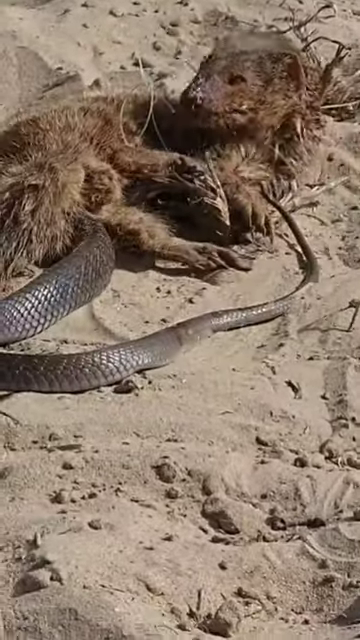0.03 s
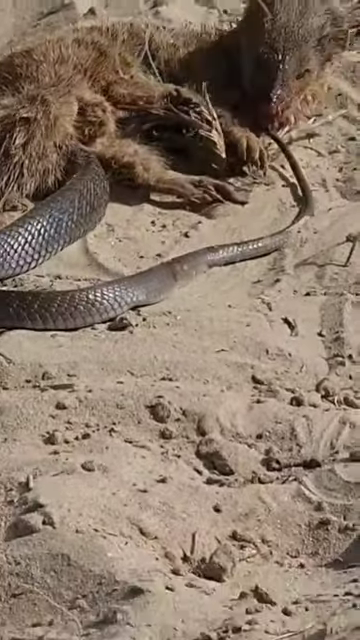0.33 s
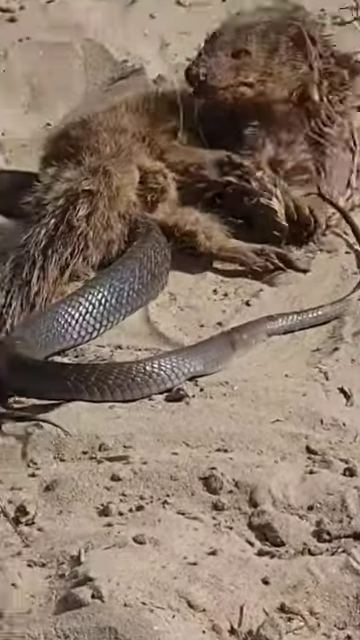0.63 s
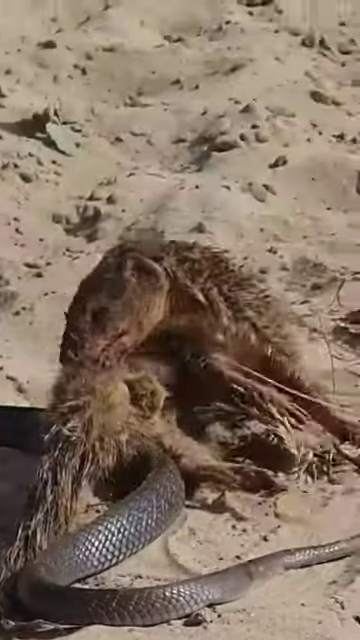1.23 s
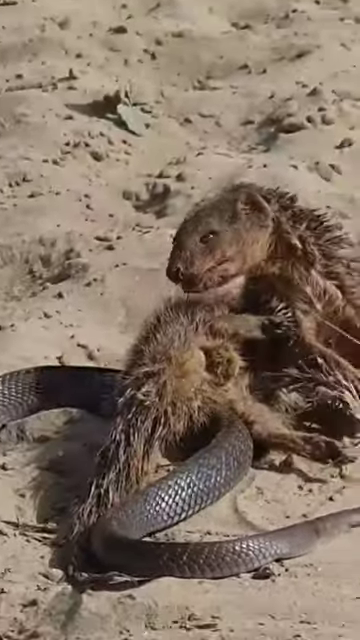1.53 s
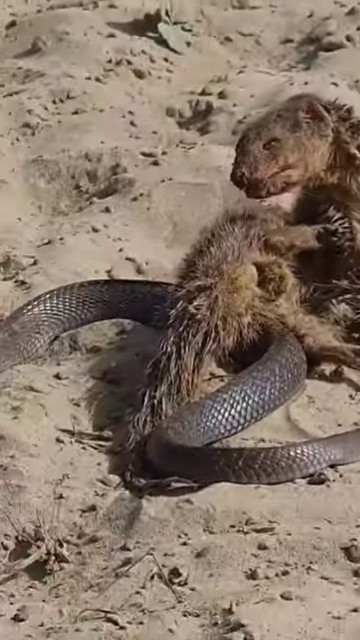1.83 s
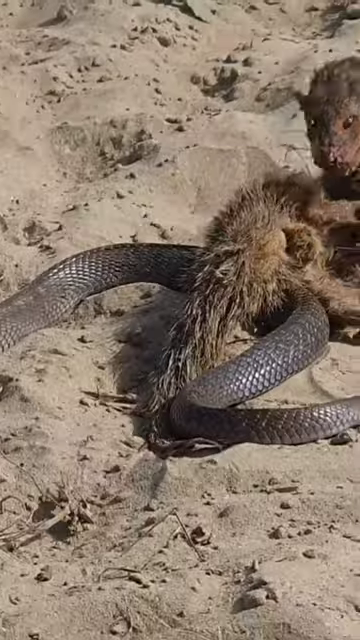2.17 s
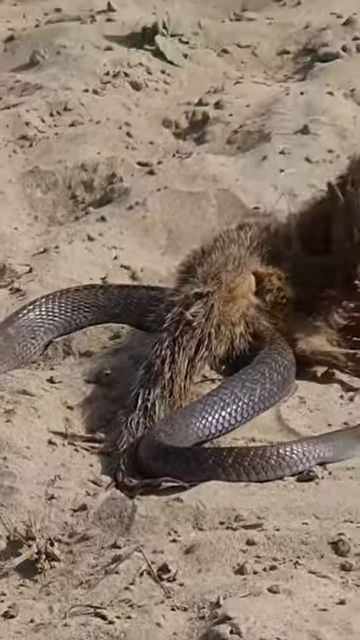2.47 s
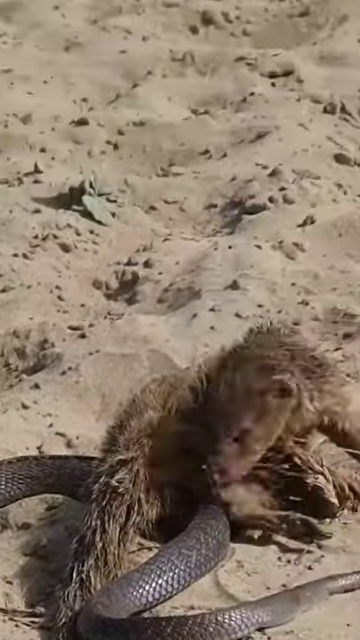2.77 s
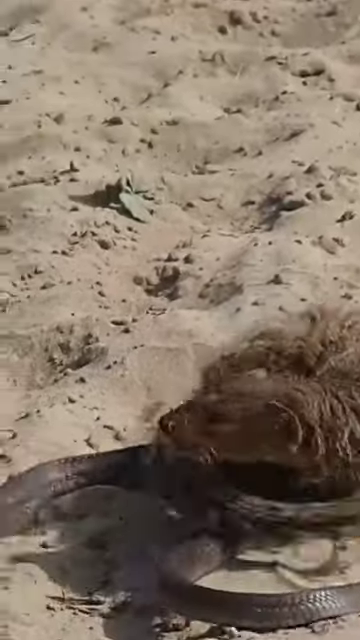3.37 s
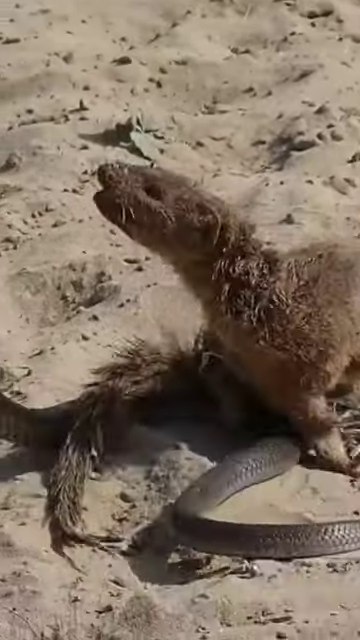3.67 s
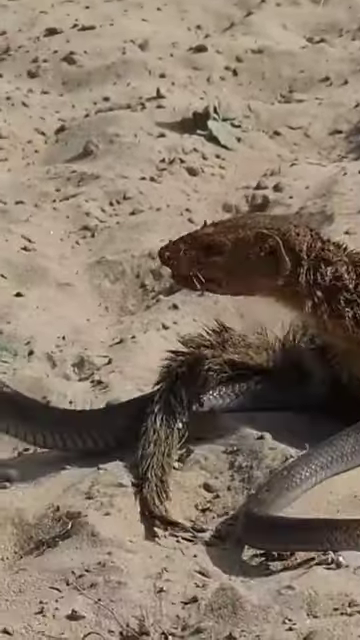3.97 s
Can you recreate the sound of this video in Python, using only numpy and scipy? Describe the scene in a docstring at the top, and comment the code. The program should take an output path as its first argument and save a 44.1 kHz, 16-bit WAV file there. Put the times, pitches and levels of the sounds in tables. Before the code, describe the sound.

Animals scuffling on dry sand, ending in a short raspy hiss, amid wind and bird whistles.

```python
"""Scales slide, paws scrape and grit ticks on dry sand, close to a handheld microphone in light wind:
a mongoose and a snake are scuffling. Late on, a lunge brings one short, spitting hiss of air forced
through the mouth, with a rasp from the throat and a soft thump on landing. Off to the right a bird
repeats a whistle that ends in a falling slur; fainter birds call far across the field.
Once, the sound cuts out for an instant with a dry crackle."""
import sys
import numpy as np
from scipy import signal
from scipy.fft import rfft, irfft
from scipy.io import wavfile
from scipy.ndimage import uniform_filter1d

SR = 44100
rng = np.random.default_rng(int(sys.argv[2]) if len(sys.argv) > 2 else 0)


def unload_wav(signal):
    """Save mono or channel-first audio to the path in sys.argv[1] as 16-bit WAV at rate SR, clipped to [-1, 1]."""
    wavfile.write(
        sys.argv[1],
        SR,
        np.round(np.clip(np.atleast_2d(signal).T, -1, 1) * 32767).astype(np.int16),
    )


N = 176400
T = np.arange(N) / SR
LUNGE_S = 3.364

# stereo width and left-right balance of ground and air (frequency [Hz], likeness [-1..1], L-R [dB])
GROUND_STEREO = [(37.8, 0.44, 0), (138, 0.88, -.5), (302, 0.85, -.5), (680, 0.33, 0.5), (1380, 0.23, 3),
                 (1900, 0.27, 6.5), (3200, -0.027, 6), (4750, 0.046, 0), (7000, 0.21, 6), (10600, 0.94, 2),
                 (15000, 0.96, 0.5)]


def amp(db):
    """Decibels to gain."""
    return 10 ** (np.asarray(db) / 20)


def unit(x):
    """Scales to rms 1."""
    return x / np.sqrt(np.mean(x ** 2) + 1e-20)


def curve(table):
    """Every column of a time table, joined by straight lines."""
    times, *columns = np.transpose(table)
    return [np.interp(T, times, c) for c in columns]


def by_hz(table, hz):
    """Every column of a frequency table, read at hz on a log axis."""
    freqs, *columns = np.transpose(table)
    return [np.interp(np.log(hz + 1), np.log(freqs), c) for c in columns]


def placed(x, pan_db):
    """Places a sound in the stereo field; positive pan_db is to the left."""
    gains = amp([[pan_db / 2], [-pan_db / 2]])
    return x * gains / gains.mean()


def add(mix, s, sound):
    """Mixes a stereo sound in at s seconds."""
    part = mix[:, round(s * SR):][:, :sound.shape[1]]
    part += sound[:, :part.shape[1]]


def drift(rate_hz):
    """Smooth random movement of rms 1."""
    hz = np.fft.rfftfreq(N, 1 / SR)
    return unit(irfft(rfft(rng.standard_normal(N)) * np.exp(-(hz / rate_hz) ** 2), N))


def texture(colour, stereo, patchy_db, grain_db=0, grains_per_s=3000):
    """Stereo noise of rms 1, made of tiny uneven grains, coloured, with drifting patches."""
    grain_index = np.cumsum(rng.random(N) < grains_per_s / SR)
    grain_gain = amp(grain_db * np.minimum(rng.exponential(1, N), 2 * np.pi))[grain_index]
    frames = dict(nperseg=2048, noverlap=1536)
    hz, _, (left, apart) = signal.stft(grain_gain * rng.standard_normal((2, N)), SR, **frames)
    likeness, pan_db = (c[:, None] for c in by_hz(stereo, hz))
    likeness = np.clip(likeness, -1, 1)
    right = likeness * left + np.sqrt(1 - likeness ** 2) * apart
    spectra = np.array([left * amp(pan_db / 2), right * amp(-pan_db / 2)])
    spectra /= np.sqrt(amp(pan_db) + amp(-pan_db))
    patches = uniform_filter1d(rng.standard_normal(left.shape), size=14, axis=0)
    patches = unit(uniform_filter1d(patches, size=6, axis=1))
    patch_db = patchy_db * patches / np.hypot(1, hz / 4000)[:, None]  # shallower above 4 kHz
    spectra *= amp(by_hz(colour, hz)[0][:, None] + patch_db)
    return unit(signal.istft(spectra, **frames)[1][:, :N])


def stroke(s, rise_s, fall_s, db):
    """A swell and fade that peaks at s seconds."""
    return amp(db) * np.exp(-.5 * ((T - s) / np.where(T < s, rise_s, fall_s)) ** 2)


def resonate(x, hz, width_hz):
    """A steep resonance at a steady or moving pitch, scaled to rms 1."""
    carrier = np.exp(2j * np.pi * np.cumsum(np.broadcast_to(hz, N)) / SR)
    lowpass = signal.butter(N=4, Wn=width_hz / 2, fs=SR, output="sos")
    return unit((carrier * signal.sosfilt(lowpass, x / carrier)).real)


def scuffle():
    """Close by, fine sand fizzes under sliding bodies; scrapes are coarser, and a heavy coil drags low."""
    # bodies sliding over sand (time [s], level [dB])
    slide_levels = [(0, -78), (.25, -68), (.3, -56), (.4, -55), (.5, -54.5), (.6, -52), (.69, -55.5),
                    (.81, -52.5), (.85, -58), (1.05, -65), (1.25, -58.5), (1.36, -69.5), (1.5, -60.5),
                    (1.75, -52), (1.85, -56.5), (1.89, -70.5), (2.7, -81), (2.85, -63.5), (3.2, -69.5),
                    (4, -78)]
    # scrapes of paws and bodies (peak time [s], rise [s], fall [s], level [dB])
    scrape_strokes = [(.44, 0.088, 0.089, -51), (.572, 0.029, 0.056, -49), (.73, 0.021, 0.042, -54.5),
                      (0.805, 0.022, 0.027, -46.5), (.952, 0.032, 0.017, -48), (1.2, 0.17, 0.03, -58),
                      (2.46, 0.039, 0.068, -56), (2.74, 0.034, 0.041, -59.5), (2.86, 0.044, 0.065, -58.5),
                      (3.295, 0.012, 0.0066, -49), (3.37, 0.03, 0.067, -52)]
    # the coil dragging over the ground (peak time [s], rise [s], fall [s], level [dB])
    drag_strokes = [(1.3, 0.33, 0.27, -56)]
    # spectra of sliding, scraping and dragging (frequency [Hz], relative level [dB])
    sand_colour = [(100, -8), (280, 9.5), (450, 5.5), (850, -6), (1400, -3), (2100, 2.5), (2900, -2.5),
                   (3600, 4), (4500, -6), (5700, 1), (7000, -1), (9000, -3.5), (11500, 4), (13500, 1.5),
                   (16000, -6.5)]
    scrape_colour = [(100, 5.5), (300, -3.5), (800, -12), (1200, -3.5), (1550, -6), (1900, 2.5),
                     (2300, -6.5), (2900, -9), (3600, -13), (4600, -28.5), (7500, -18), (10000, -31),
                     (16000, -18)]
    drag_colour = [(120, -9), (260, 7.5), (420, -6), (800, -33)]
    slide = texture(sand_colour, GROUND_STEREO, patchy_db=6, grain_db=1.34, grains_per_s=4000)
    slide *= amp(curve(slide_levels)[0] + 0.95 * drift(38))
    scrapes = texture(scrape_colour, GROUND_STEREO, patchy_db=2.5, grain_db=2, grains_per_s=1800)
    scrapes *= np.sqrt(sum(stroke(*row) ** 2 for row in scrape_strokes))
    drag = texture(drag_colour, GROUND_STEREO, patchy_db=4) * sum(stroke(*row) for row in drag_strokes)
    return placed(slide, pan_db=-4.5) + scrapes + drag


def hiss():
    """Air forced through a narrow mouth, which rings hollow as it gapes at the lunge."""
    # strength of the hiss (time [s], sharp edge [dB], breathy middle [dB])
    hiss_levels = [(2.4, -100, -100), (2.8, -65, -59.5), (3.0, -63, -64.5), (3.2, -61, -63.5),
                   (3.28, -53.5, -52), (3.344, -44, -48.5), (3.368, -42, -44.5), (3.412, -38, -46.5),
                   (3.455, -42, -48), (3.506, -48, -55.5), (3.545, -46, -53), (3.58, -45, -47),
                   (3.64, -49, -51), (3.71, -49, -52.5), (3.756, -52.5, -58.5), (3.8, -77, -62.5),
                   (3.85, -79, -109)]
    # spectra of the edge and the middle (frequency [Hz], relative level [dB])
    edge_colour = [(3000, -46), (4700, -34), (5700, -16), (6600, -12), (8600, -15.5), (10000, -19.5),
                   (11300, -10), (12100, -5), (12900, -4), (14100, 2), (15000, 0.5), (16000, -15)]
    middle_colour = [(300, -13), (850, -33), (1010, -9), (1220, -16), (1440, -5), (1640, -5.5), (2080, 6.5),
                     (2420, -4.5), (2740, 1), (3050, -20), (3450, -10.5), (4300, -17.5), (9000, -22)]
    # stereo width and left-right balance of the hiss (frequency [Hz], likeness [-1..1], L-R [dB])
    hiss_stereo = [(640, 0.95, 1), (1200, .4, 2.7), (2120, 0.54, 12.7), (2880, .1, 9.3), (4450, -0.29, 1.2),
                   (6300, -0.82, 6.9), (8550, .6, 17), (10700, .95, 1.6), (14000, 0.85, 3.5)]
    # resonances of the wide-open mouth (frequency [Hz], width [Hz], level [dB])
    gape_modes = [(1010, 190, -55), (1440, 180, -55.5), (2754, 280, -51.5), (3230, 560, -57)]
    edge_db, middle_db = curve(hiss_levels)
    edge = texture(edge_colour, hiss_stereo, patchy_db=9.5) * amp(edge_db + 0.87 * drift(80))
    middle = texture(middle_colour, hiss_stereo, patchy_db=1, grain_db=1.5, grains_per_s=370)
    gape = sum(amp(db) * resonate(rng.standard_normal(N), hz, width) for hz, width, db in gape_modes)
    gape *= stroke(LUNGE_S + 0.0077, rise_s=0.029, fall_s=0.065, db=0)
    return edge + middle * amp(middle_db) + placed(gape, pan_db=8)


def spit():
    """Spurts of air through the teeth; their pitch shoots up as the lunge begins."""
    # spurts at the start of the hiss (peak time [s], rise [s], fall [s], level [dB])
    spurts = [(3.365, .005, .014, -46), (3.413, .01, .01, -51.5)]
    top_hz, climb_hz, climb_s = 8760, 2500, 0.001
    hz = top_hz - climb_hz / (1 + np.exp(np.minimum((T - LUNGE_S) / climb_s, 20)))
    air_jet = resonate(rng.standard_normal(N), hz, width_hz=2160)
    return placed(air_jet * sum(stroke(*row) for row in spurts), pan_db=13)


def rasp():
    """Uneven flaps ring one band of the throat; landing presses out a lower grunt."""
    # the throat under the hiss (time [s], level [dB])
    rasp_levels = [(3.3, -90), (3.35, -66), (3.364, -43.5), (3.395, -54), (3.428, -45.5), (3.45, -50),
                   (3.462, -46), (3.48, -47), (3.555, -53), (3.575, -50.5), (3.64, -51.5), (3.75, -52.5),
                   (3.785, -86), (3.82, -89)]
    flaps_per_s, flap_spread_db, throat_hz = 110, 1.5, 639
    cycles = np.cumsum(flaps_per_s * np.exp(.4 * drift(70))) / SR
    pulses = np.diff(np.floor(cycles), prepend=0)
    flaps = unit(pulses * amp(flap_spread_db * rng.standard_normal(N)))
    airflow = flaps + .7 * rng.standard_normal(N)
    throat = resonate(airflow, throat_hz * (1 + 0.05 * drift(30)), width_hz=216)
    throat *= amp(curve(rasp_levels)[0])
    grunt = resonate(airflow, hz=524, width_hz=197) * stroke(3.577, rise_s=.008, fall_s=.032, db=-42.5)
    return placed(throat + grunt, pan_db=3)


def grit():
    """Grit and twigs tick near the microphone, each a fast-dying burst in one band; the broad tick at 3.363 s
    is instead the crackle of the spit as the lunge begins."""
    # ticks (time [s], centre [Hz], width [octaves], decay [ms], starting level [dB], L-R [dB])
    ticks = [(.2958, 13000, .45, 1.2, -40, -7), (.6338, 15000, .6, 1.4, -33, -.5),
             (.7205, 11000, .13, 1, -47, -2), (.801, 4000, 1.3, .6, -44, 3), (.8232, 1750, .4, 1.8, -35, 6),
             (1.487, 5900, .2, 2.5, -55, -2), (2.0198, 2080, .1, 4, -47, 5), (2.549, 8000, .4, 1, -60, 5),
             (2.711, 2300, .3, 1.5, -51, 4), (2.737, 2500, .2, 3, -53, 4),
             (2.7568, 2100, .38, 2.6, -41.5, 5.5), (2.8145, 1100, 1.4, 2, -49, -4.5),
             (3.3358, 1950, .25, 2.5, -39, 7), (3.3634, 2500, .45, 10, -45, 9),
             (3.7034, 2030, .2, 3, -47, 9)]
    out, t = np.zeros((2, N)), T[:4096]
    hz = np.fft.rfftfreq(len(t), 1 / SR)
    for s, centre_hz, octaves, decay_ms, db, pan_db in ticks:
        decay_s = decay_ms / 1000
        burst = rng.standard_normal(len(t)) * np.exp(-t / decay_s)
        band = np.exp(-.5 * (np.log2((hz + 1) / centre_hz) / octaves) ** 2)
        tick = np.fft.fftshift(irfft(rfft(burst) * band))  # onset sits mid-buffer
        gain = amp(db) * np.sqrt(decay_s * SR / 2) / np.linalg.norm(tick)
        add(out, s - len(t) / 2 / SR, placed(gain * tick, pan_db))
    return out


def thumps():
    """Bodies land on the sand with a dull, low push."""
    # landings (time [s], pitch [Hz], swell [s], envelope peak [dB])
    landings = [(0.947, 227, 0.0063, -37), (3.575, 47.3, 0.017, -29.5)]
    out, t = np.zeros((2, N)), T[:4096]
    for s, pitch_hz, swell_s, db in landings:
        age = t / swell_s
        envelope = amp(db) * age * np.exp((1 - age ** 2) / 2)
        add(out, s, placed(envelope * np.sin(2 * np.pi * pitch_hz * t), pan_db=2))
    return out


def wind():
    """Light gusts rumble on the microphone."""
    # wind strength (time [s], level [dB])
    gusts = [(0, -41.5), (.28, -46), (.4, -39), (.58, -41.5), (.645, -32), (.82, -44.5), (.93, -30.5),
             (1.05, -43), (1.2, -44), (1.3, -35.5), (1.47, -44.5), (1.7, -41), (1.93, -44.5), (2.1, -40.5),
             (2.5, -46.5), (2.72, -42), (3.2, -46.5), (3.68, -44), (3.8, -36.5), (4, -48)]
    # spectrum of the rumble (frequency [Hz], relative level [dB])
    rumble_colour = [(10, -8), (25, -8), (38, 6), (47, 1), (58, 8), (72, -1.5), (90, -10), (125, -9),
                     (190, -30.5), (400, -34.5), (1000, -63)]
    return texture(rumble_colour, GROUND_STEREO, patchy_db=0.5) * amp(curve(gusts)[0] + 0.27 * drift(35))


def bird():
    """A pure whistle swells on the right, breaks off and slurs down to the left; the field echoes it."""
    # calls (time [s], whistle length [s], pitch [Hz], whistle [dB], slur [dB], whistle L-R [dB])
    calls = [(1.908, .091, 3090, -54.5, -59, -12), (2.373, 0.095, 3044, -55.5, -59.5, -26),
             (2.804, 0.085, 3047, -46.5, -57, -9), (3.251, 0.073, 3010, -58, -58, -14)]
    overshoot_hz, settle_s, release_s = 211, 0.0276, .004
    slur_s, step_hz, drop_hz, flutter_db = 0.048, 268.6, 1223, 3
    echo_db, echo_decay_s = -19, .06
    out = np.zeros((2, N))
    for s, length, pitch_hz, db, slur_db, pan_db in calls:
        t = T[:round((length + slur_s) * SR)]
        slur_progress = np.maximum(t - length, 0) / slur_s
        hz = pitch_hz + overshoot_hz * np.exp(-t / settle_s)
        hz -= step_hz * (slur_progress > 0) + drop_hz * slur_progress ** 0.94
        hz *= 1 + 0.0027 * drift(150)[:len(t)]
        tone = np.sqrt(2) * np.sin(2 * np.pi * np.cumsum(hz) / SR)
        swell = np.minimum(t / (0.56 * length), 1) ** 1.13
        whistle = amp(db) * swell * np.clip((length - t) / release_s, 0, 1)
        slur = abs(np.sin(np.pi * slur_progress)) * amp(slur_db + flutter_db * drift(140)[:len(t)])
        add(out, s, placed(tone * whistle, pan_db) + placed(tone * slur, pan_db=6))
    tail = rng.standard_normal((2, SR)) * np.exp(-T[:SR] / echo_decay_s)
    echo = signal.fftconvolve(out.mean(0)[None], tail / np.linalg.norm(tail[0]), axes=1)[:, :N]
    return out + amp(echo_db) * echo


def far_birds():
    """Faint, short falling notes, far off to the left."""
    # distant notes (time [s], length [s], start pitch [Hz], end pitch [Hz], level [dB])
    notes = [(2.205, 0.06, 1850, 1730, -64.5), (2.249, .04, 4200, 4020, -73),
             (2.431, 0.028, 1480, 1420, -64), (2.622, 0.065, 2100, 1940, -60.5),
             (2.655, 0.025, 3800, 3570, -69)]
    out = np.zeros((2, N))
    for s, length, start_hz, end_hz, db in notes:
        progress = np.linspace(0, 1, round(length * SR))
        hz = (start_hz + (end_hz - start_hz) * progress) * (1 + 0.015 * drift(200)[:len(progress)])
        tone = np.sqrt(2) * np.sin(2 * np.pi * np.cumsum(hz) / SR)
        add(out, s, placed(amp(db) * np.sin(np.pi * progress) * tone, pan_db=10))
    return out


def air():
    """A quiet outdoor wash with a soft, narrow hiss wandering in it."""
    # still air over the field (frequency [Hz], relative level [dB])
    air_colour = [(30, 3), (150, -1.5), (280, -2.5), (550, -9), (900, -17), (1350, -14.5), (1850, -9.5),
                  (2250, -12), (2750, -20.5), (3500, -15), (4500, -24.5), (6000, -26), (9200, -38),
                  (11800, -24), (16000, -27.5)]
    # the wandering hiss (time [s], centre [Hz], level [dB])
    band_path = [(0, 1810, -57), (.1, 1760, -58.5), (.25, 1790, -70.5), (.58, 2006, -52.5),
                 (.85, 1810, -79), (1.3, 2140, -65), (1.6, 1910, -74), (2.2, 1810, -63.5),
                 (2.66, 1970, -79), (2.8, 1890, -75), (3.03, 2030, -61.5), (3.17, 1830, -73),
                 (3.85, 1930, -74), (4, 1810, -65.5)]
    centre_hz, db = curve(band_path)
    left, apart = (resonate(rng.standard_normal(N), centre_hz, width_hz=426) for _ in range(2))
    right = unit(left + 4.9 * apart)
    band = placed(np.array([left, right]), pan_db=6) * amp(db)
    return amp(-56.5) * texture(air_colour, GROUND_STEREO, patchy_db=3) + band


def scene():
    """Everything heard at the microphone."""
    # brief dips in the level of air and scuffle (time [s], width [s], depth [dB])
    dips = [(1.354, 0.0024, -14), (2.137, 0.012, -4.5), (3.846, 0.034, -7.5)]
    dip_gain = amp(sum(db * np.exp(-.5 * ((T - s) / width) ** 2) for s, width, db in dips))
    bed = wind() + dip_gain * (air() + scuffle())
    return bed + hiss() + spit() + rasp() + grit() + thumps() + bird() + far_birds()


def record(dry):
    """The sound cuts out for an instant, with a click at each edge; then the recorder's band limit."""
    # gaps heard as a dry crackle (time [s], length [s], size of the jump [dB])
    dropouts = [(1.2655, .0038, -34.5), (1.2698, .0013, -39)]
    cutoff_hz = 15850
    out = dry.copy()
    for s, length, db in dropouts:
        start, end = round(s * SR), round((s + length) * SR)
        out[:, start:end] = np.linspace(dry[:, start], dry[:, end], end - start, axis=1) + amp(db)
    lowpass = signal.firwin(511, cutoff_hz, window=("kaiser", 9), fs=SR)
    return signal.oaconvolve(out, lowpass[None], "same")


dry = scene()
out = record(dry)
unload_wav(out)
```